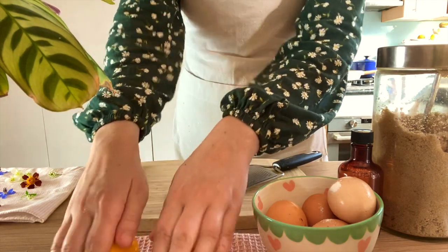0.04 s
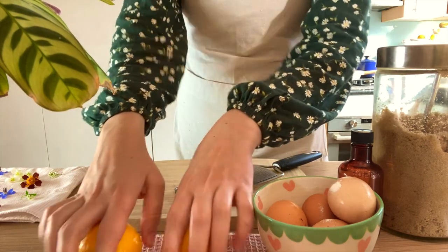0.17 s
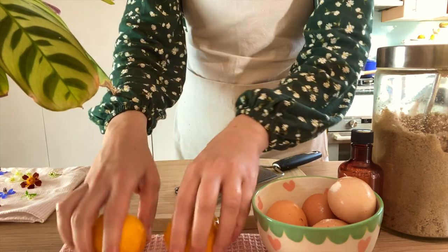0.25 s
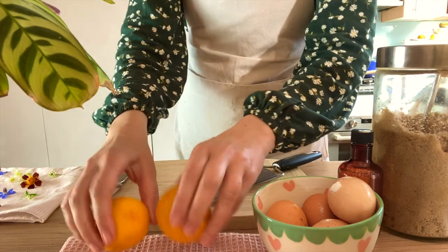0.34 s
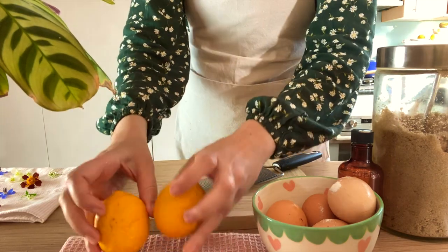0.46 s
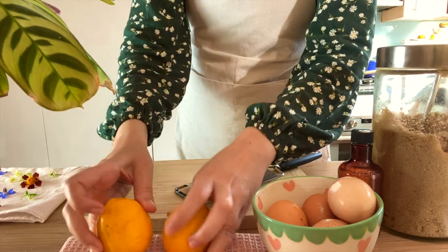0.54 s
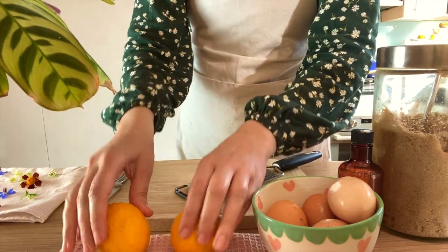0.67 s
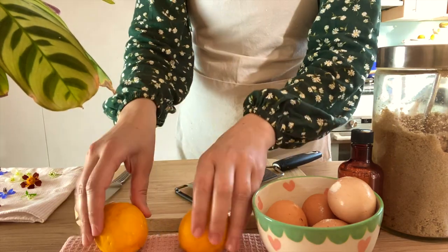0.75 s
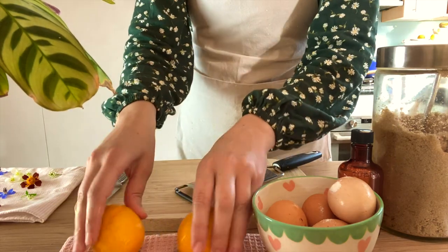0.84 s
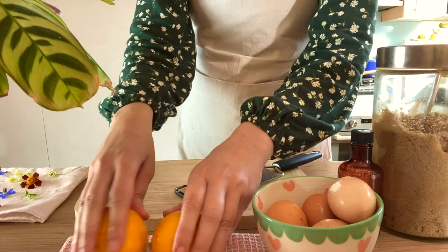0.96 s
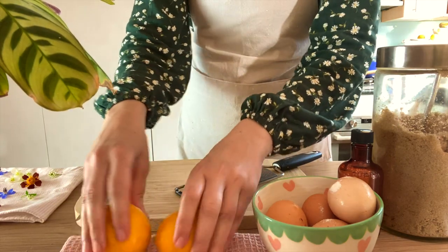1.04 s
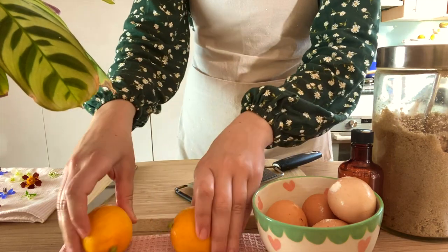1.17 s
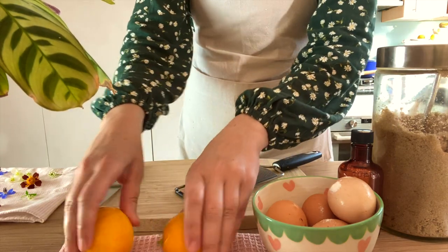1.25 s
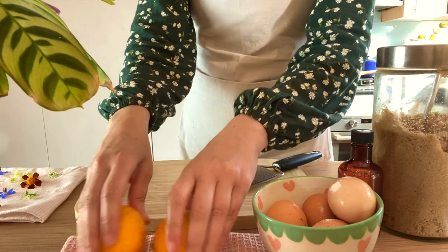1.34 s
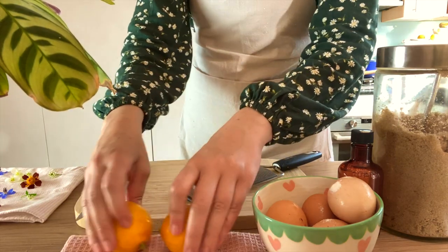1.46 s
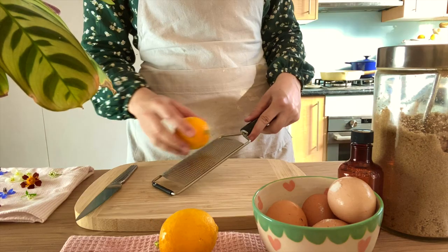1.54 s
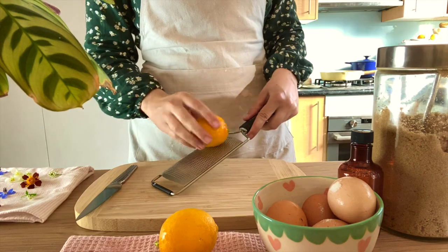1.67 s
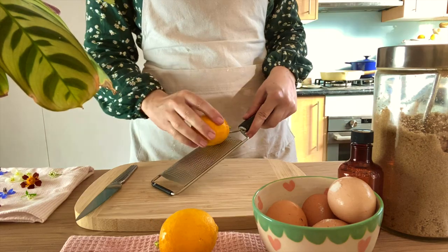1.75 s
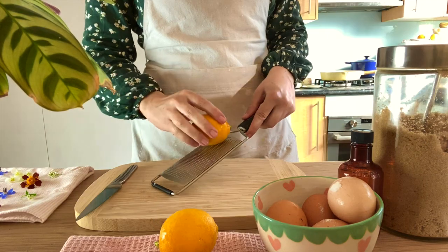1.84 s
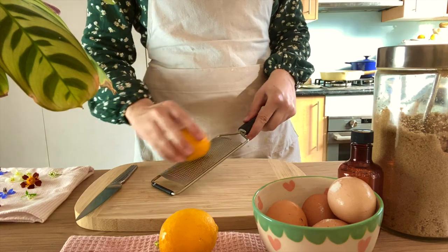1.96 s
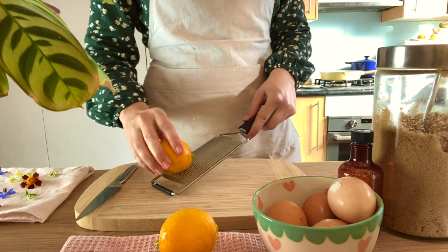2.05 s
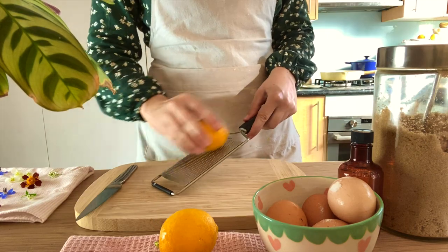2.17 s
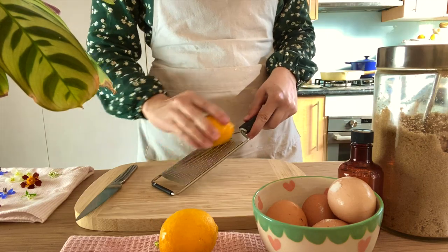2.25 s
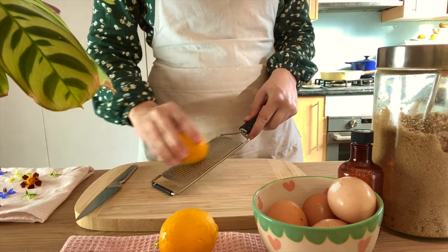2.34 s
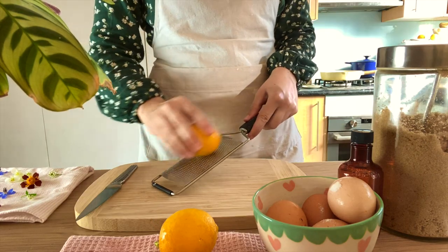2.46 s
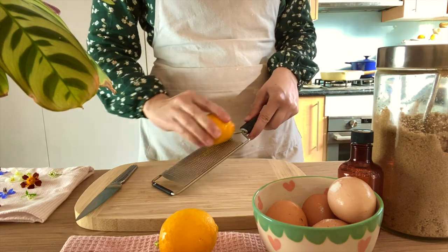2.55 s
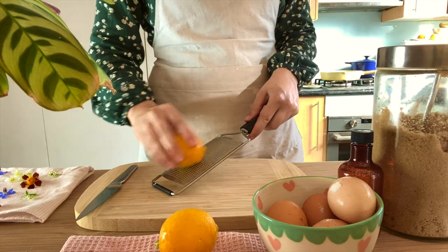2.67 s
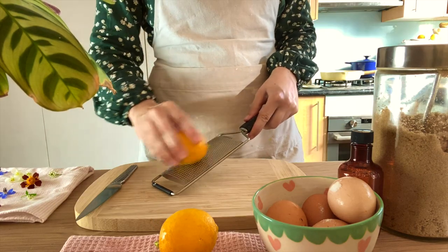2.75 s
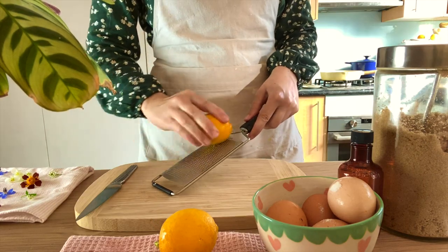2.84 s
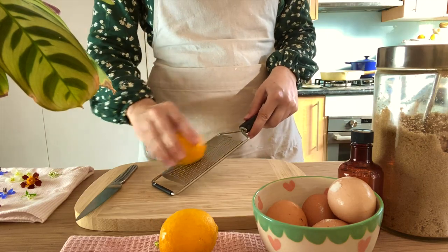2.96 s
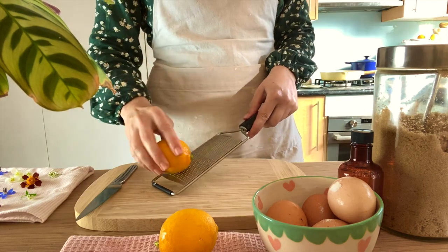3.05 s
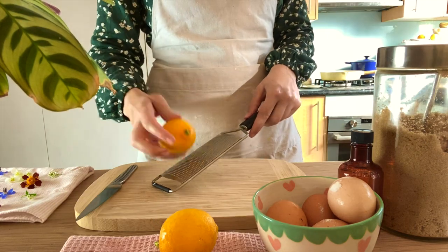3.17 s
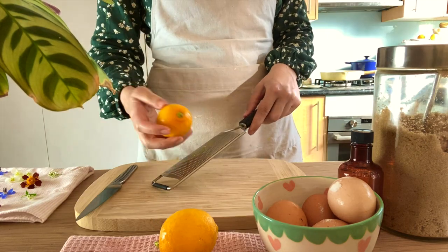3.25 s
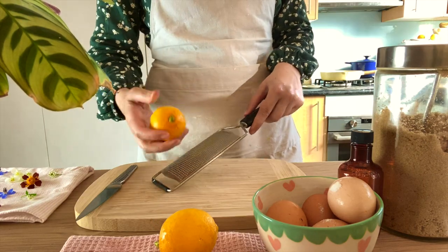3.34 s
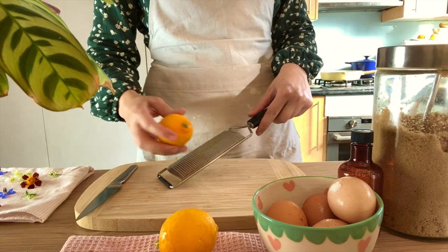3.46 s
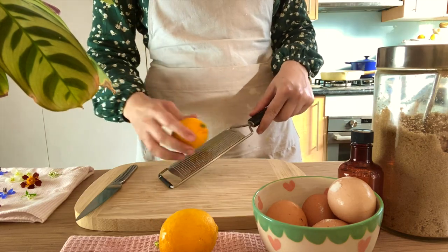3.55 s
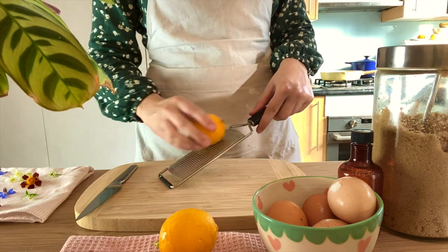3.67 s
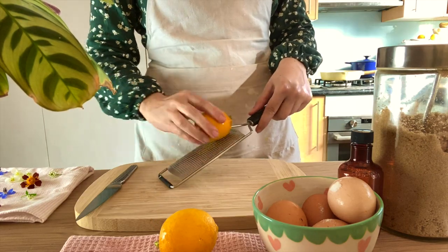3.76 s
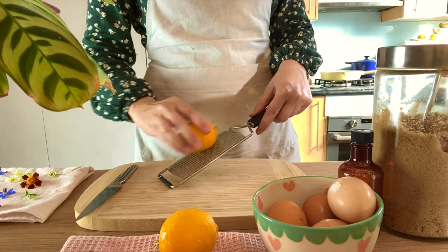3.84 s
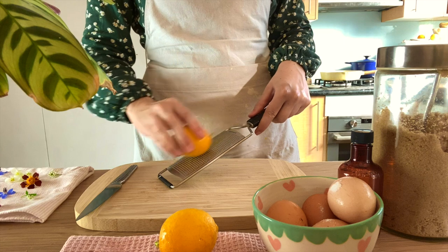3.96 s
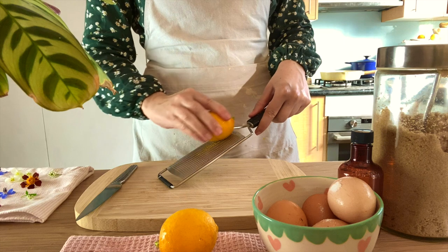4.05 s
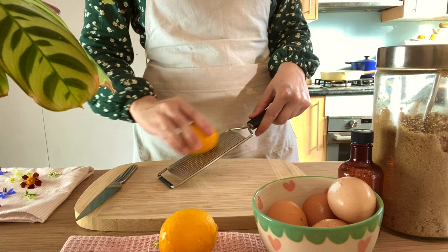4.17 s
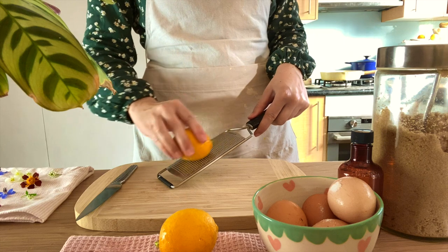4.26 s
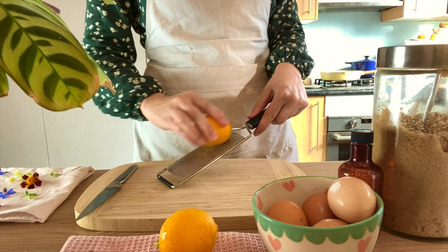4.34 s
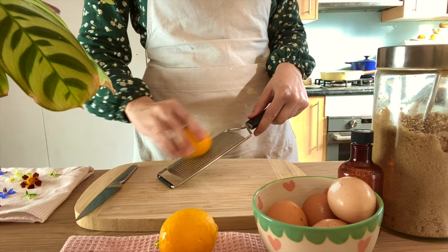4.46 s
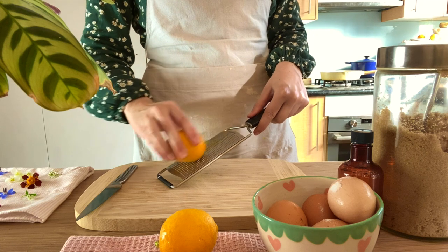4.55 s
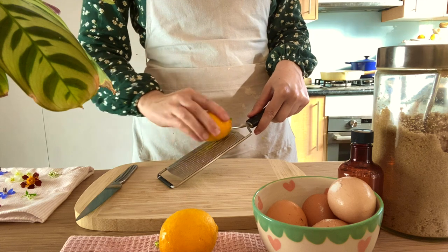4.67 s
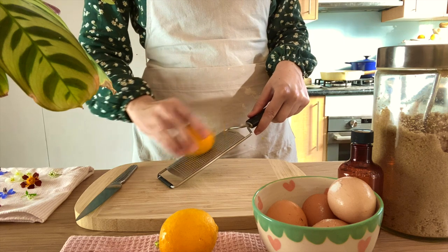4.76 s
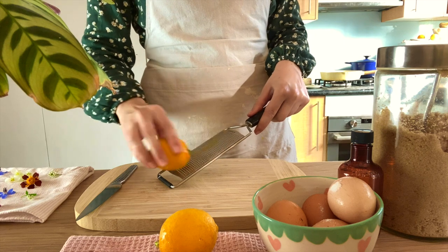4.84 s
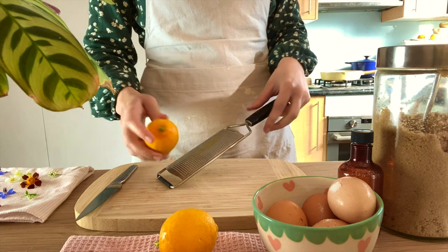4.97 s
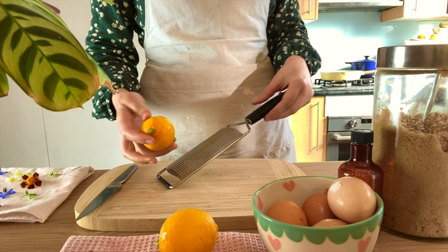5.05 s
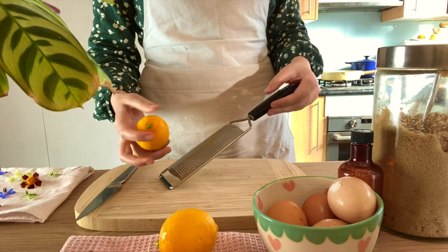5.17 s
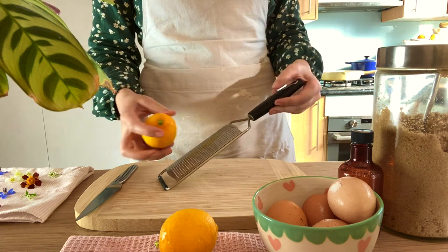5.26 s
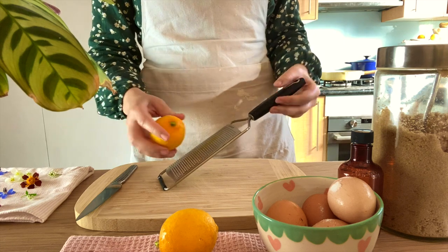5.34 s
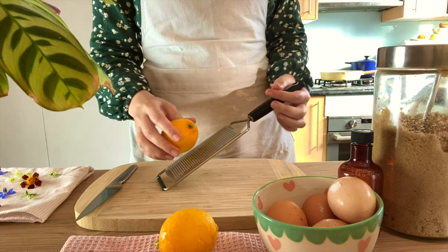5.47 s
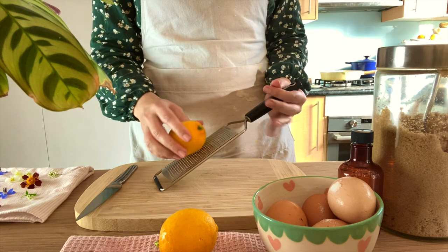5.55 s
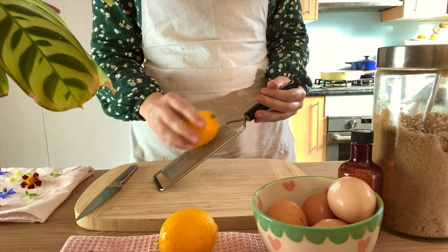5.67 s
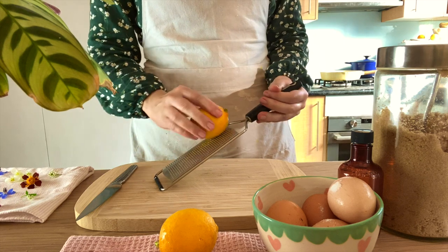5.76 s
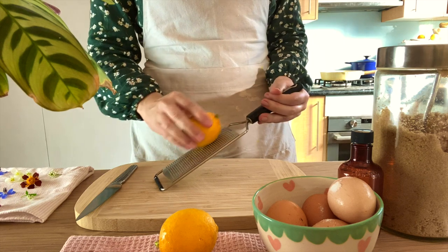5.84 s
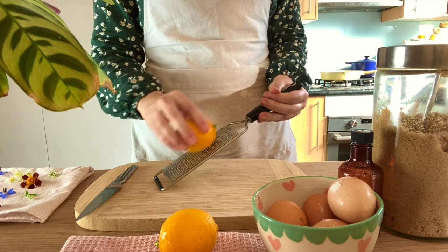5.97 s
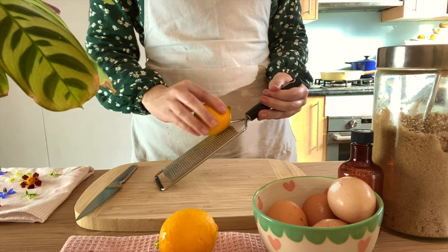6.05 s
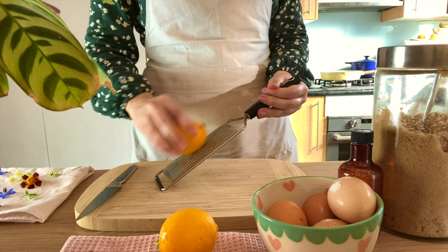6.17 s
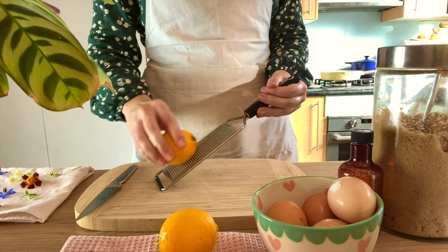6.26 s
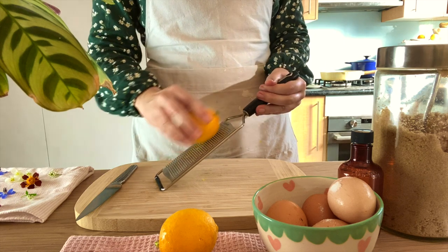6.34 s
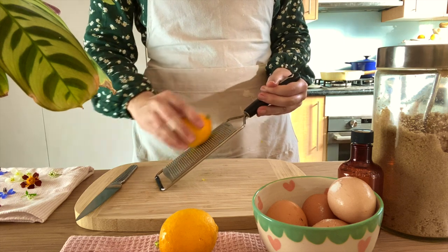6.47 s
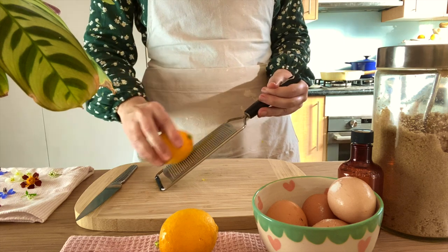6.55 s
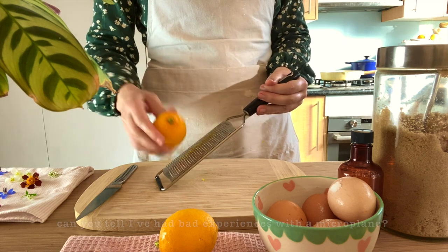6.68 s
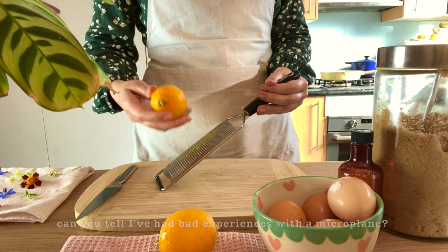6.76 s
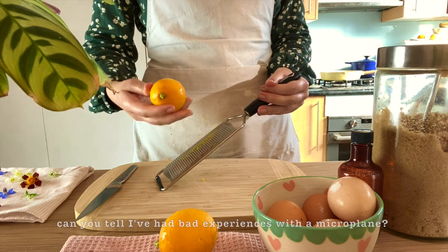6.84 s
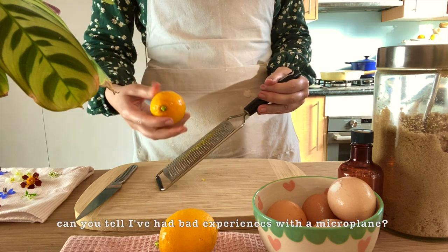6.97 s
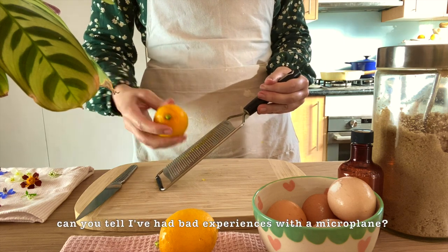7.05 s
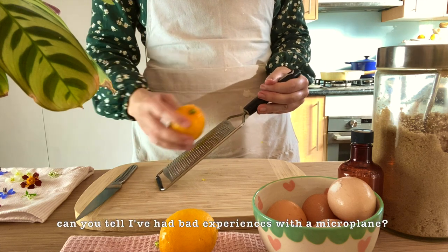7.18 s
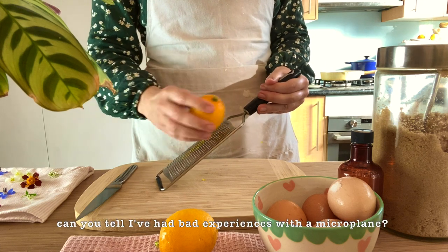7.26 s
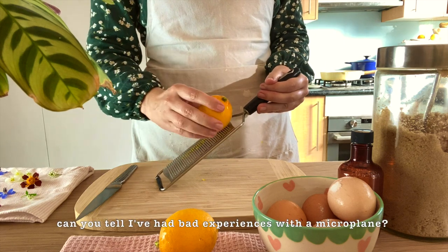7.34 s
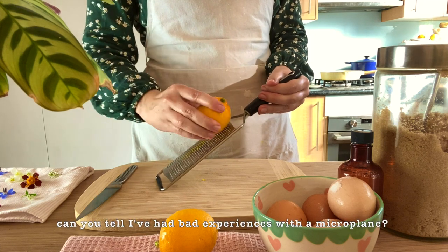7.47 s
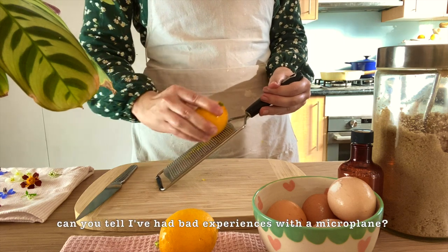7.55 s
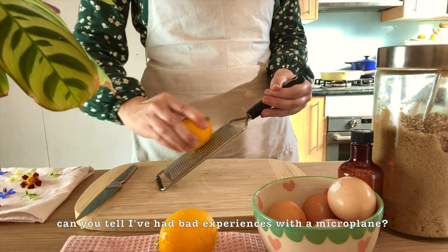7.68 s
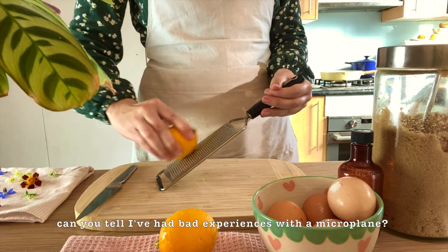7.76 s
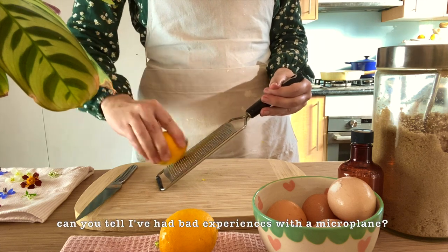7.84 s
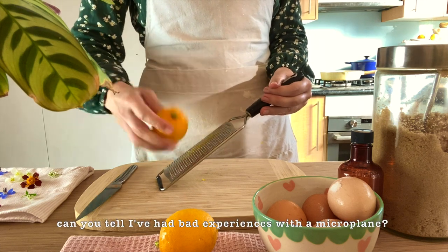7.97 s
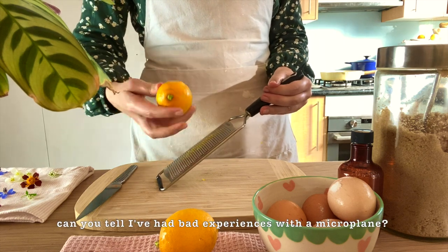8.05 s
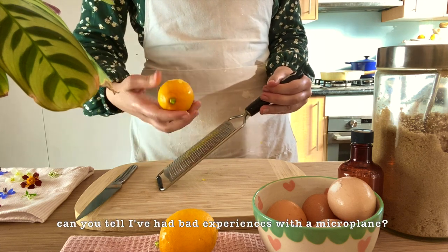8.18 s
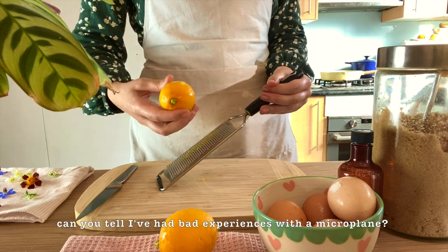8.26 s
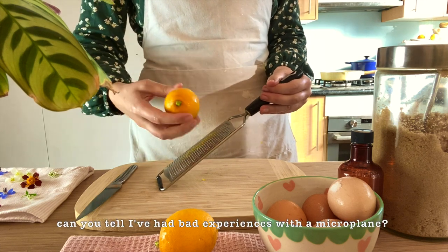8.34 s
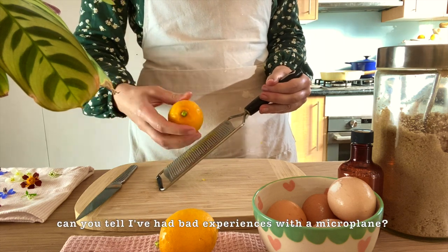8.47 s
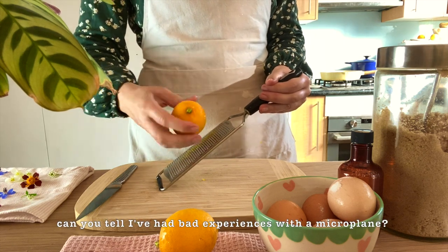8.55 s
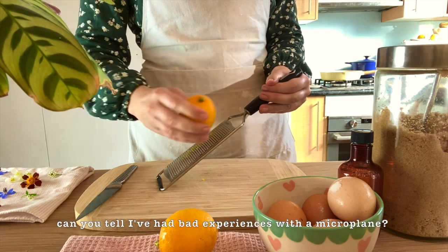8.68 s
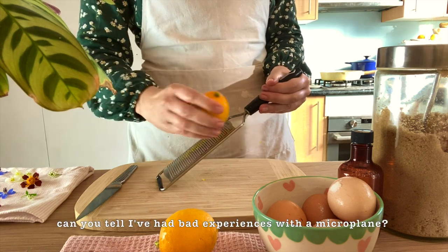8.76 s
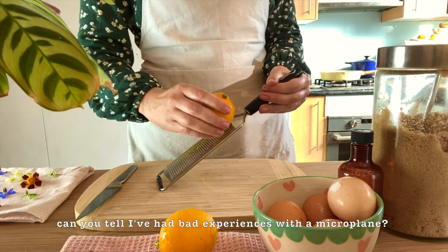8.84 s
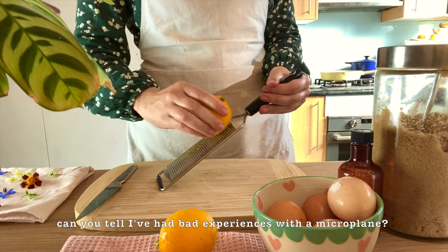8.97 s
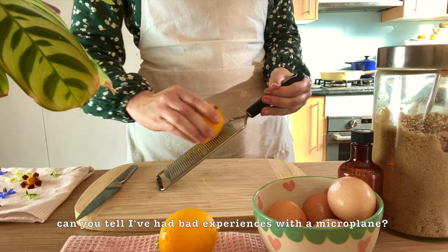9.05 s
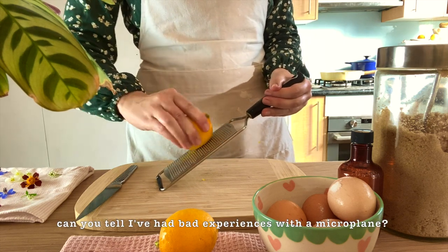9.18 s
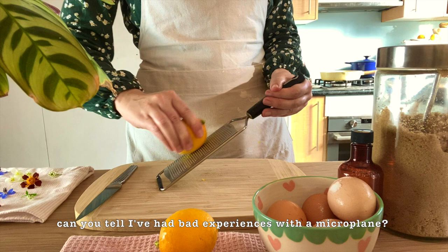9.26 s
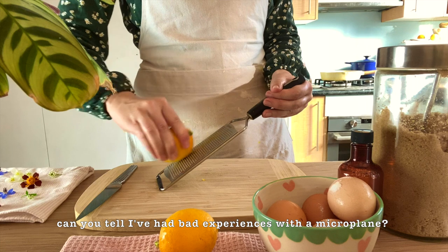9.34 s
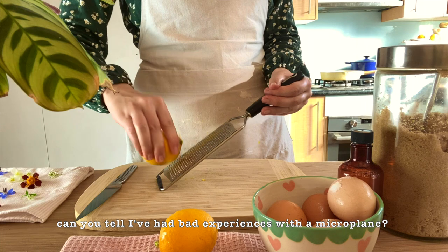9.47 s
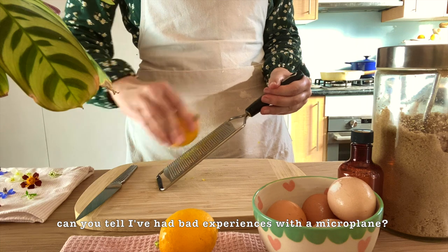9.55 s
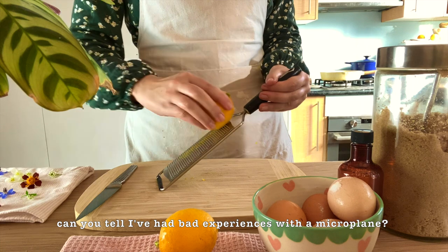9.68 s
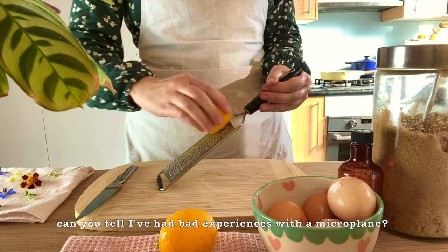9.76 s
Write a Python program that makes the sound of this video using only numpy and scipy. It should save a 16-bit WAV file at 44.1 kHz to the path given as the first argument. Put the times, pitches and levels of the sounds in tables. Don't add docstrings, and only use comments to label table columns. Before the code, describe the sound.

Quiet kitchen rumble and faint finger rubs, then a citrus fruit rasped over a fine steel grater on a wooden board, with knocks and pauses.

```python
import sys
import numpy as np
from scipy import signal
from scipy.fft import rfft, irfft, next_fast_len
from scipy.io import wavfile
from scipy.ndimage import uniform_filter1d

SR = 44100
rng = np.random.default_rng(int(sys.argv[2]) if len(sys.argv) > 2 else 0)


def generate_wav(sig):
    pcm = np.round(np.clip(np.atleast_2d(sig).T, -1, 1) * 32767).astype(np.int16)
    wavfile.write(sys.argv[1], SR, pcm)


def volts_from_db(level):
    exponent = np.asarray(level, float) / 20
    return 10 ** exponent


N = 432621
SIZE = next_fast_len(N + SR)
HZ = np.maximum(np.arange(SIZE // 2 + 1) * SR / SIZE, 1)
MS = np.arange(0, N / SR + .002, .001)

# pitch_hz, width_hz, level_db
BOARD_MODES = [(61.5, 6.8, -2.5), (108.9, 5, 1.5), (137, 27, -3.5), (192.5, 19.4, 1.5), (232.7, 43, -4.5),
               (255.4, 38.5, -1.5), (307, 50, -13.5)]
# pitch_hz, width_hz, level_db
FRAME_MODES = [(343, 32.3, -9.5), (401.1, 18.3, 2.5), (490, 92, -9.5), (499.5, 17, -2.5), (566, 65, -22.5)]
# pitch_hz, level_db (per Hz)
TEAR_COLOUR = [(3300, -31), (3900, 0.5), (4700, -2), (6000, -5.5), (7300, -3.5), (8500, -7), (9200, -4.5),
               (12000, -5), (15000, -8)]


def unit(x):
    return x / np.sqrt(np.mean(x ** 2))


def along(table, column=1):
    table = np.array(table, float)
    return np.interp(np.log(HZ), np.log(np.maximum(table[:, 0], 1)), table[:, column])


def modes(table):
    total = 0
    for k, (hz, width, db) in enumerate(table):
        resonance = 1j * width * HZ / (hz * hz - HZ ** 2 + 1j * width * HZ)
        total = total + (-1) ** k * volts_from_db(db) * resonance
    return total


def ring(force, response):
    power = np.mean(np.abs(response) ** 2)
    return irfft(rfft(force, SIZE) * response / np.sqrt(power), SIZE)[..., :N]


def walk(rate):
    k = int(SR / rate)
    steps = np.repeat(rng.standard_normal(N // k + 1), k)
    return 0.9045 * uniform_filter1d(steps, k)[:N]


def fade(x, seconds):
    return signal.lfilter([1], [1, -np.exp(-1 / (seconds * SR))], x)


def swell(s, rise, hold, rise_db, release):
    climb = rise_db * np.clip((s - MS) / rise, 0, 3) ** 2
    fall = release * np.maximum(MS - s - hold, 0)
    return -climb - fall


def summed(levels_db):
    power = np.sum(volts_from_db(2 * np.array(levels_db)), axis=0)
    return np.interp(np.arange(N) / SR, MS, 10 * np.log10(power + 1e-14))


def catches(rate, scatter_db):
    hit = rng.random(N) < rate / SR
    return unit(hit * rng.standard_normal(N) * volts_from_db(scatter_db * rng.exponential(size=N)))


def stick_slip():
    slip_times = [1.923, 2.272, 2.597, 2.907, 3.825, 4.122, 4.421, 4.72, 5.825, 6.11, 6.32, 6.429, 7.1,
                  7.331, 7.518, 7.582, 7.6, 7.77, 7.795, 8.198, 8.987, 9.105, 9.14, 9.164, 9.225, 9.33,
                  9.36, 9.385, 9.756]
    big = np.zeros(N)
    big[(np.array(slip_times) * SR).astype(int)] = 1
    small = fade((rng.random(N) < 60 / SR) * rng.exponential(size=N), .008)
    held_back = fade(big[::-1], .011)[::-1]
    return 3 * fade(big, .011) - 6 * held_back + 1.6 * (small - small.mean())


def hums():
    # pitch_hz, level_db
    motors = [(47, -70.5), (107, -75.5), (83.2, -74), (65.5, -70), (100, -73.5), (78, -67.5)]
    # start_s, stop_s
    motor_times = [
        (0, 9.81),
        (0, 1.56),
        (.95, 1.6),
        (4.6, 7.3),
        (8.0, 8.8),
        (6.8, 9.0),
    ]
    t, out = np.arange(N) / SR, 0
    for (hz, db), (start, stop) in zip(motors, motor_times):
        on = np.clip(np.minimum(t - start + .1, stop + .1 - t) / .15, 0, 1)
        level = volts_from_db(db + 1.0 + 3.7 * walk(2.1))
        pitch_hz = hz * (1 + .008 * walk(11.0))
        out = out + on * level * np.sin(2 * np.pi * np.cumsum(pitch_hz) / SR)
    return out


def house():
    # pitch_hz, level_db (per Hz)
    house_colour = [(25, -20), (38, -3), (55, -4), (100, -5.5), (150, -17.5), (500, -26), (1500, -34.5),
                    (4000, -39), (8000, -43.5), (15000, -47)]
    house_db = -68.5
    shape = volts_from_db(along(house_colour))
    colour = volts_from_db(house_db) * shape / np.sqrt(np.mean(shape ** 2))
    alike = along([(60, 0.61), (300, 0.083), (900, 0.031), (6000, 0.1), (7600, 0.81), (15000, 0.54)])
    alike = np.clip(alike, 0, 1)
    rumble = rng.standard_normal(N) * volts_from_db(2 * walk(5))
    hiss = rng.standard_normal(N)
    shared = np.where(HZ < 300, rfft(rumble, SIZE), rfft(hiss, SIZE)) * colour * np.sqrt(alike)
    apart = rfft(rng.standard_normal((2, N)), SIZE) * colour * np.sqrt(1 - alike)
    return irfft(shared, SIZE)[:N] + hums(), irfft(apart, SIZE)[:, :N]


def touches():
    # start_s, rise_s, release_db_per_s, rub_db, edge_db (above the rub)
    finger_rubs = [(.02, 0.062, 96, -84, -5), (.27, .08, 253, -79.5, -3), (.4, 0.076, 100, -83.5, -10),
                   (.575, 0.078, 300, -80.5, -7.5), (.875, .05, 203, -87.5, 2), (.96, 0.071, 72, -86.5, -8),
                   (1.395, 0.097, 191, -79.5, -7.5), (3.35, 0.088, 103, -82, -11),
                   (3.66, 0.096, 58.5, -82.5, -17), (5.0, .03, 110, -88, -23), (5.72, 0.15, 146, -84, -14),
                   (7.111, 0.019, 193, -68.5, -56), (7.185, .03, 206, -83, 7),
                   (7.335, 0.011, 189, -72, 7.5), (8.04, 0.03, 102, -86, -12.5),
                   (8.115, 0.036, 150, -81, -22), (8.205, 0.018, 117, -70.5, -12),
                   (8.342, 0.039, 252, -74, -23), (8.491, 0.023, 131, -72, -30),
                   (8.764, 0.078, 300, -81, -23), (8.911, 0.093, 150, -75.5, -29),
                   (9.71, 0.071, 204, -76.5, -26)]
    # start_s, rise_s, release_db_per_s, rumble_db
    arm_shakes = [(.565, .02, 207, -60.5), (1.67, 0.043, 90, -65), (3.2, .05, 198, -70),
                  (3.36, 0.058, 132, -51), (3.65, 0.032, 20, -55.5), (5.0, 0.083, 78, -41),
                  (5.25, 0.28, 18.5, -59), (5.62, 0.11, 36, -48), (6.76, 0.14, 19, -69),
                  (7.12, 0.066, 87, -62), (7.345, 0.052, 119, -53.5), (8.031, 0.037, 205, -74),
                  (8.21, .08, 70, -64.5), (8.49, 0.064, 42, -65.5), (8.83, 0.17, 63, -63),
                  (8.93, 0.095, 148, -49), (9.7, 0.029, 94, -48)]
    rise_db, still_table_db = 25, -86
    rubs, edges = [], []
    for s, rise, release, db, edge_db in finger_rubs:
        level = db + swell(s, rise, 0, rise_db, release)
        rubs.append(level)
        edges.append(level + edge_db)
    shakes = [still_table_db + 0 * MS]
    for s, rise, release, db in arm_shakes:
        shakes.append(db + swell(s, rise, 0, rise_db, release))
    rub_db = summed(rubs)
    return rub_db, summed(edges) - rub_db, summed(shakes)


def hands():
    rub_db, edge_db, table_db = touches()
    rub = volts_from_db(rub_db + stick_slip())
    skin = modes([(1098, 1400, -7.0), (2390, 1000, 1), (3240, 1300, -4)])
    dull = ring(rub * catches(rate=2200, scatter_db=2.0), skin)
    bright = volts_from_db(along(TEAR_COLOUR)) * (HZ > 3000) / (1 + (HZ / 12000) ** 4)
    edge = ring(rub * volts_from_db(edge_db + 3.5) * catches(rate=11000, scatter_db=2.5), bright)
    table_top = modes([(55.6, 51.4, -5.5), (111.4, 43.2, 1.5), (187.7, 94.6, -6.5), (293.4, 68, -9.0)])
    table_top = table_top / (1 + (40 / HZ) ** 4)
    table = ring(volts_from_db(table_db - 4.0) * rng.standard_normal(N), table_top)
    return dull + edge + table


def knocks():
    # start_s, peak_db, upper_db (high modes above the peak)
    blows = [(0.561, -68, -23), (1.017, -67, -20), (1.656, -50, -18), (3.356, -29.5, -19),
             (3.617, -39.5, -27), (3.685, -38.5, -18), (3.806, -31, -29), (4.968, -30, -11.5),
             (5.001, -33, 1), (5.064, -28, -12.5), (5.28, -48.5, -33), (5.565, -37.5, -23.5),
             (5.626, -49, -31), (5.699, -40, -30), (5.838, -31, -20), (7.333, -39.5, -15.5),
             (7.518, -36, -21), (8.818, -28.5, -26.5), (8.859, -39.5, -33), (9.685, -35.5, -24)]
    # pitch_hz, width_hz, level_db
    wood_modes = [(426, 43, -5.5), (557, 56, 1.5), (687, 82, -1.5), (926, 170, -6.5), (1073, 53, -3),
                  (1400, 940, -15.5), (1760, 100, -36), (2500, 950, -28)]
    low, high, k = np.zeros(N + 4000), np.zeros(N + 4000), np.arange(4000)
    push = np.hanning(60) * np.exp(-k[:60] / 13.5)
    crack = np.exp(-k / 25.3)
    rattle = volts_from_db(-21) * np.exp(-k / 790)
    for s, db, upper_db in blows:
        i = int(s * SR)
        low[i:i + 60] += volts_from_db(db) * push
        high[i:i + 4000] += volts_from_db(db + upper_db) * rng.standard_normal(4000) * (crack + rattle)
    drum = modes(BOARD_MODES) + volts_from_db(-5.0) * modes(FRAME_MODES)
    wood = modes(wood_modes) / (1 + (HZ / 1640) ** 5)
    return volts_from_db(0.2) * ring(low, drum) + volts_from_db(6.0) * ring(high, wood)


def strokes():
    # start_s (full pressure), rise_s, hold_s, blade_db (ring), board_db (drum)
    cuts = [
        (1.97, 0.08, .06, -45.5, -43),
        (2.32, 0.08164, 0.024, -37.5, -38),
        (2.645, .08, .025, -39, -39),
        (2.94, .065, 0.052, -41, -38),
        (3.86, 0.079, .02, -47.5, -39.5),
        (4.175, 0.0848, 0.012, -42.5, -39),
        (4.465, .07, 0.021, -40.5, -39),
        (4.755, .065, 0.028, -39, -37.5),
        (5.87, .075, 0.014, -51, -41.5),
        (6.17, .08, 0.022, -44, -34),
    ]
    drags = [
        (2.18, .12, 0.016, -50, -48.5),
        (2.5, .1, 0.021, -50, -44.5),
        (2.81, .1, 0.018, -46.5, -45),
        (4.04, .1, 0.019, -60, -47.5),
        (4.335, .09, 0.016, -51.5, -46),
        (4.635, .1, .015, -50, -47),
        (6.03, .08, 0.023, -62, -51),
        (6.335, .05, 0.032, -53, -47),
    ]
    slow_cuts = [
        (6.5, .13, 0.08, -49.5, -37.5),
        (7.66, .19, 0.18, -52.5, -37.5),
        (9.1, 0.18, .085, -55.5, -43.5),
        (9.33, .2, 0.037, -49.5, -36),
        (9.79, .08, .05, -55.5, -41.5),
    ]
    # rise_db (climb), release_db_per_s, frame_db (hum), hiss_db (above the ring),
    # rows_hz (tooth rows per s at the top), glide_hz_per_s (teeth brake a cut, a drag gathers speed)
    cut_kind = (38, 229.5, -46, -8.5, 225, -550)
    drag_kind = (22.5, 378.5, -42.5, -6, 400, 1900)
    slow_kind = (38, 236, -45.5, -7, 259.5, -300)
    frame_follows_board, usual_board_db, glide_s = 0.86, -39, .12
    board_depth, frame_depth, hiss_depth = 0.83, 1, 1.39
    blade, board, frame, hiss, rate = [], [], [], [], []
    for rows, kind in ((cuts, cut_kind), (drags, drag_kind), (slow_cuts, slow_kind)):
        rise_db, release, frame_db, hiss_db, rows_hz, glide = kind
        for s, rise, hold, blade_db, board_db in rows:
            shape = swell(s, rise, hold, rise_db, release)
            lean_db = frame_follows_board * (board_db - usual_board_db)
            blade.append(blade_db + shape)
            board.append(board_db + board_depth * shape)
            frame.append(frame_db + lean_db + frame_depth * shape)
            hiss.append(blade_db + hiss_db + hiss_depth * shape)
            rate.append(rows_hz + glide * np.clip(MS - s, -rise, glide_s))
    ring_db = summed(blade)
    strongest = np.argmax(blade, axis=0)
    rows_hz = np.array(rate)[strongest, np.arange(len(MS))]
    rows_hz = np.interp(np.arange(N) / SR, MS, rows_hz)
    return ring_db, summed(board) - ring_db, summed(frame) - ring_db, summed(hiss) - ring_db, rows_hz


def damped(force, table, tilt_db=0):
    patchy_db, patches_per_s = 0.5, 30
    whole = np.sqrt(np.mean(np.abs(modes(table)) ** 2))
    out = 0
    for k, third in enumerate(np.array_split(np.array(table), 3)):
        response = modes(third)
        share = np.sqrt(np.mean(np.abs(response) ** 2)) / whole
        level = volts_from_db(patchy_db * walk(patches_per_s) + (k - 1) * tilt_db)
        out = out + (-1) ** k * share * ring(force * level, response)
    return out


def rasp():
    # pitch_hz, width_hz, level_db
    blade_modes = [(1420, 780, -3.5), (2004, 73, 4), (2140, 91, -2), (2376, 97, 3), (2586, 240, -1.5),
                   (2970, 14, -7.5), (2957, 62, -10), (3255, 370, 2.5), (3513, 540, -3.5)]
    # pitch_hz, width_hz, level_db
    rim_modes = [(652, 89, -1.5), (757, 23, 3.5), (807, 56, 2.5), (904, 130, 3.5), (1012, 360, -11.5),
                 (1128, 57.5, 0), (1331, 40, -2)]
    blade_db, board_db, frame_db, hiss_db, rows_hz = strokes()
    rows = np.cos(2 * np.pi * np.cumsum(rows_hz * (1 + 0.0596 * walk(70))) / SR)
    bumps = unit(rows * volts_from_db(2.9 * walk(60)))
    press = volts_from_db(blade_db + stick_slip() + 0.43 * walk(190))
    teeth = catches(rate=9000, scatter_db=0.7) * volts_from_db(rows)

    bite_db = np.clip(0.13 * (blade_db + 53.5), -5, 3)
    blade = damped(press * volts_from_db(-1.7) * teeth, blade_modes, bite_db)
    rim = damped(press * volts_from_db(.3 * frame_db + 0.89 * hiss_db + 4.0) * teeth, rim_modes)

    frame_push = catches(rate=3000, scatter_db=3.1) + volts_from_db(-23) * bumps
    frame = ring(press * volts_from_db(frame_db + 0.1) * frame_push, modes(FRAME_MODES))
    foot = HZ ** 2 / (HZ ** 2 + 60 ** 2)
    board_push = catches(rate=1500, scatter_db=2.96) + volts_from_db(-22.5) * bumps
    board = ring(press * volts_from_db(board_db - 1.0) * board_push, modes(BOARD_MODES) * foot)

    tear_level = volts_from_db(hiss_db + 3.5 + 1.7 * walk(40) + 0.87 * rows)
    tear = press * tear_level * catches(rate=12000, scatter_db=-4.1)
    return blade + rim + frame + board + ring(tear, volts_from_db(along(TEAR_COLOUR)) * (HZ > 3000))


def burst(t60, delay):
    t = np.arange(SR // 2) / SR
    x = rng.standard_normal((2, len(t))) * volts_from_db(-60 * t / t60) * (t > delay)
    return rfft(x / np.sqrt(np.sum(x ** 2) / 2), SIZE)


def kitchen(x):
    # pitch_hz, t60_s (time to fall 60 dB), tail_db, scatter_db (off the moving hand)
    room_bands = [(100, 0.28, -13.5, -11.5), (400, 0.48, -9, -8.5), (1210, 0.21, -2, 0.5),
                  (2820, 0.044, -6, 2), (4400, 0.28, -4.5, 0.5), (7000, 0.13, -9, -2),
                  (14100, 0.19, -30, -19)]
    tail = 0
    for k, (hz, t60, db, _) in enumerate(room_bands):
        share = along([(row[0], j == k) for j, row in enumerate(room_bands)])
        tail = tail + volts_from_db(db) * share * burst(t60, 0.015)
    wavering = x * np.array([walk(70), walk(70)])
    moving = rfft(wavering, SIZE) * volts_from_db(along(room_bands, column=3)) * burst(0.017, 0.00056)
    return irfft(rfft(x, SIZE) * tail + moving, SIZE)[:, :N]


def scene():
    # pitch_hz, lead_radians
    port_lead = [(100, 0), (500, 0), (860, -1.6), (1250, 0), (3000, -.9), (3600, -.5), (4200, -2.3),
                 (5500, -2.6), (6400, -1.2), (7900, 0), (8500, .1), (10300, 3.1), (10900, 3.2),
                 (12700, 6.2), (13500, 6.4), (15400, 9.4)]
    # pitch_hz, level_db
    port_tilt = [(60, 3), (200, 1.5), (400, 6), (700, 2.5), (1050, -8.5), (1400, 0), (15000, -0.5)]
    shared, apart = house()
    near = hands() + knocks() + rasp()
    sign = np.array([[1], [-1]])
    ports = volts_from_db(sign * along(port_tilt) / 2) * np.exp(1j * sign * along(port_lead) / 2)
    direct = irfft(rfft(near + shared, SIZE) * ports, SIZE)[:, :N]
    return direct + kitchen(near) + apart


def low_pass(x):
    return signal.sosfilt(signal.butter(12, 15710, fs=SR, output="sos"), x)


def record(dry):
    return low_pass(dry)


dry = scene()
out = record(dry)
generate_wav(out)
```